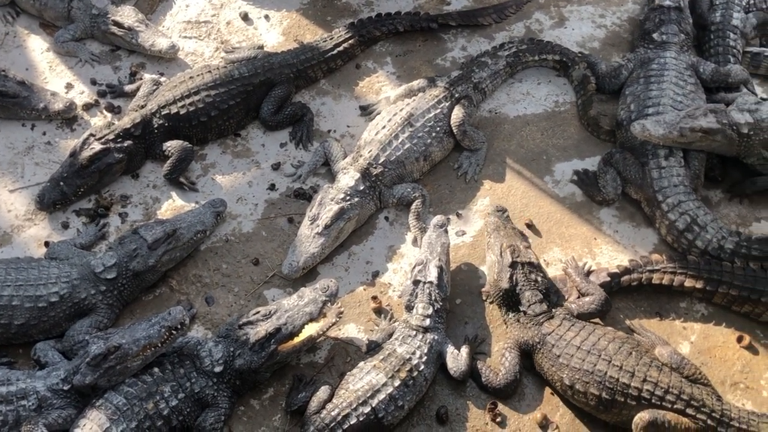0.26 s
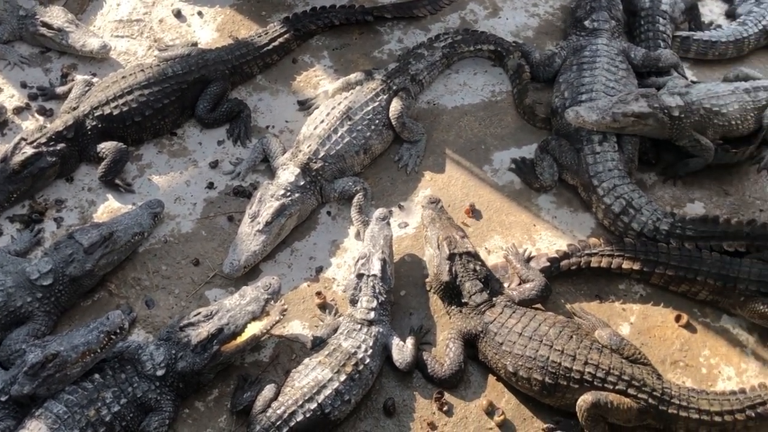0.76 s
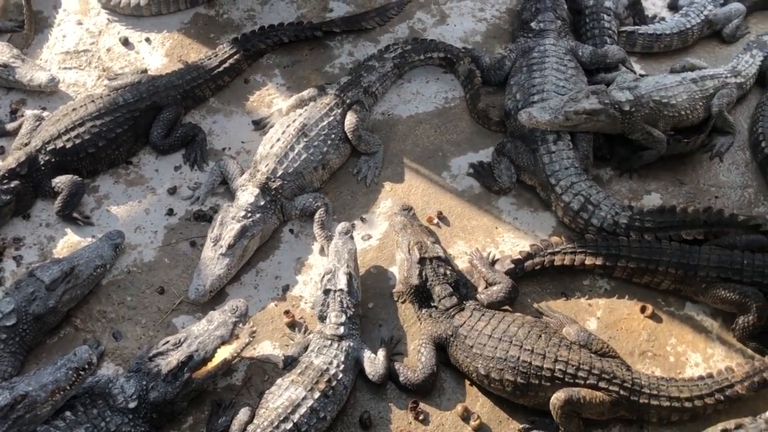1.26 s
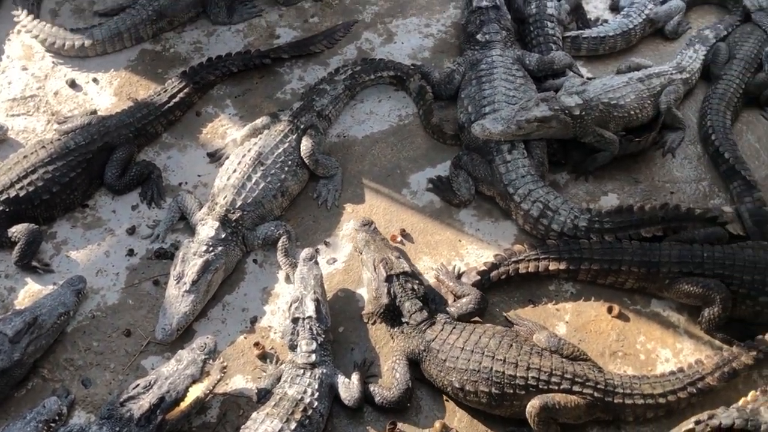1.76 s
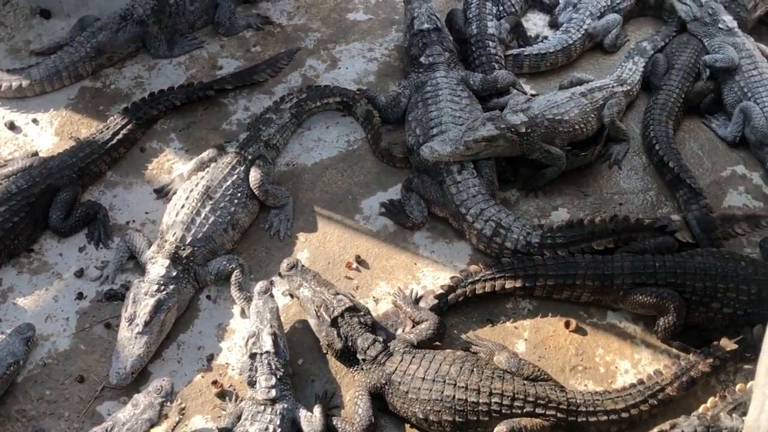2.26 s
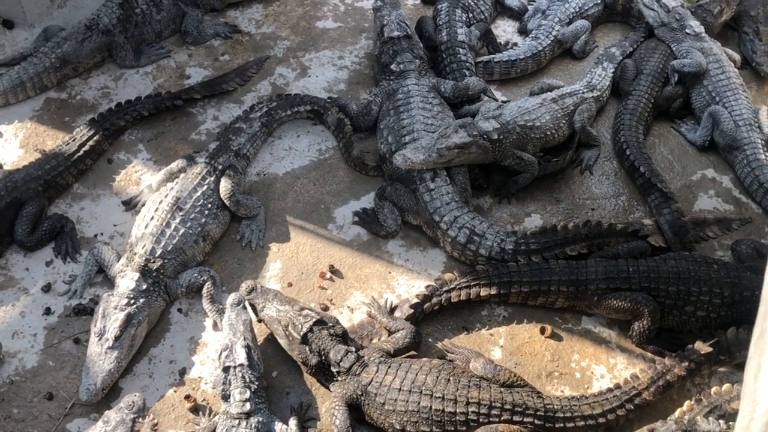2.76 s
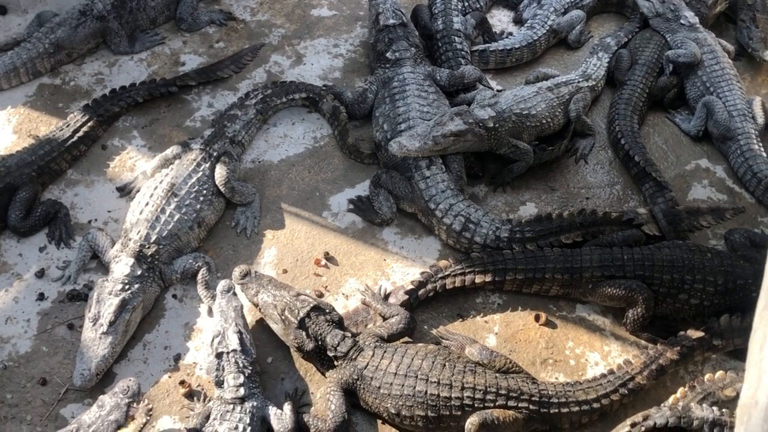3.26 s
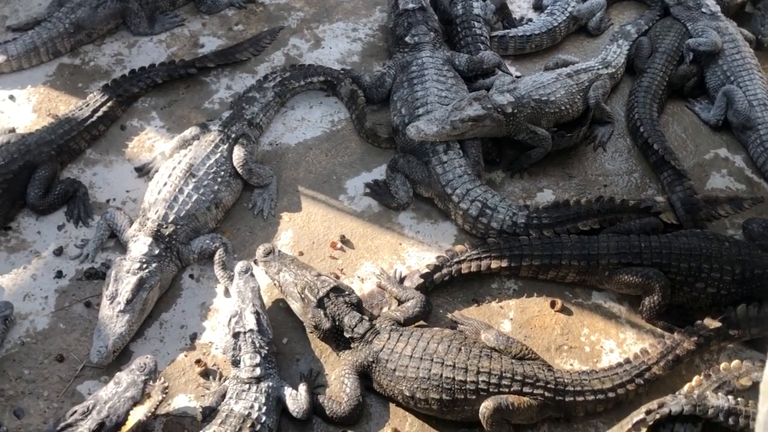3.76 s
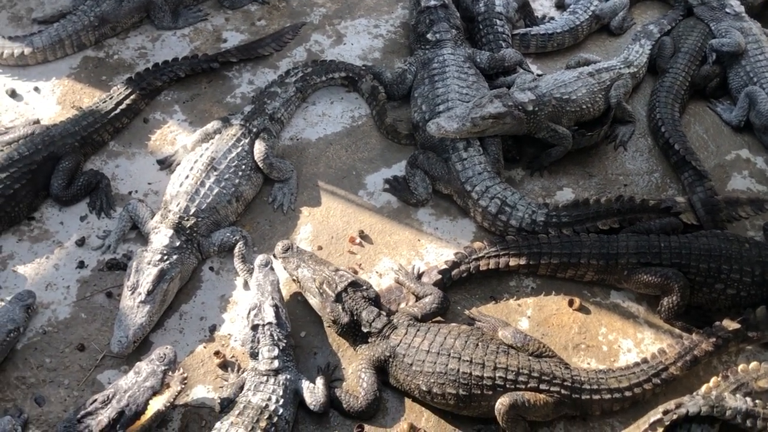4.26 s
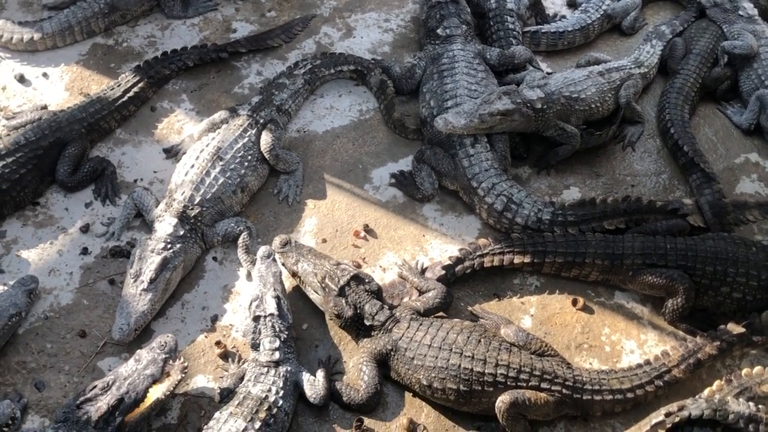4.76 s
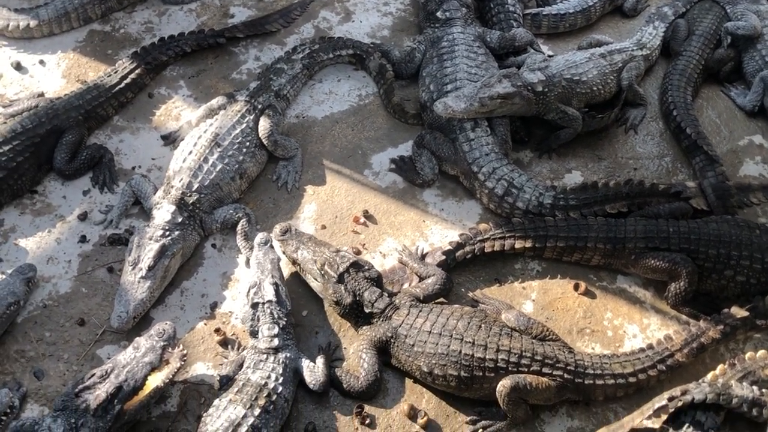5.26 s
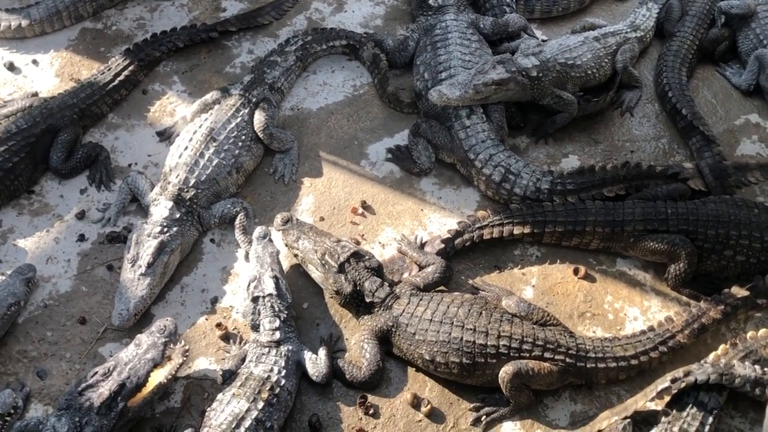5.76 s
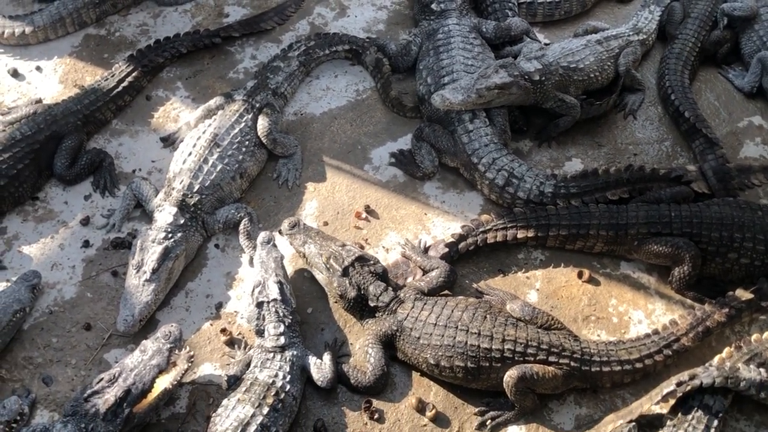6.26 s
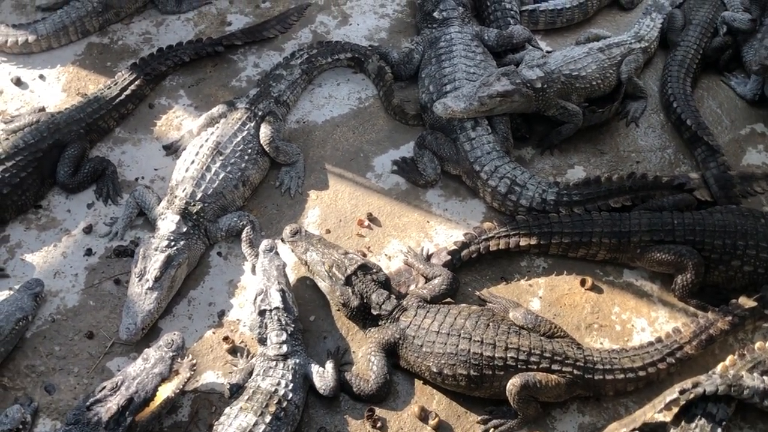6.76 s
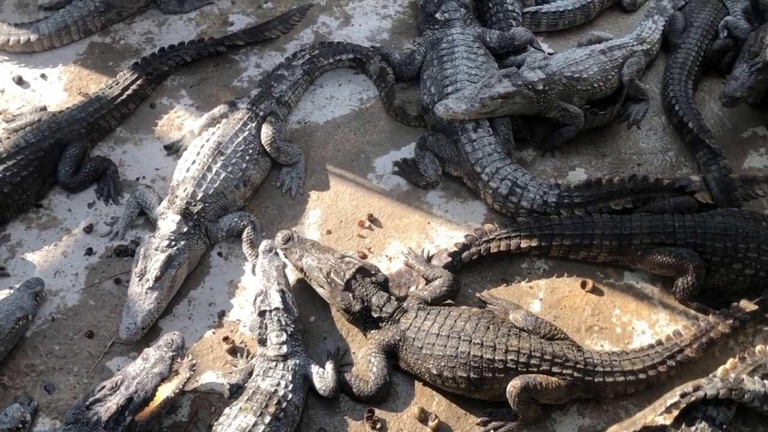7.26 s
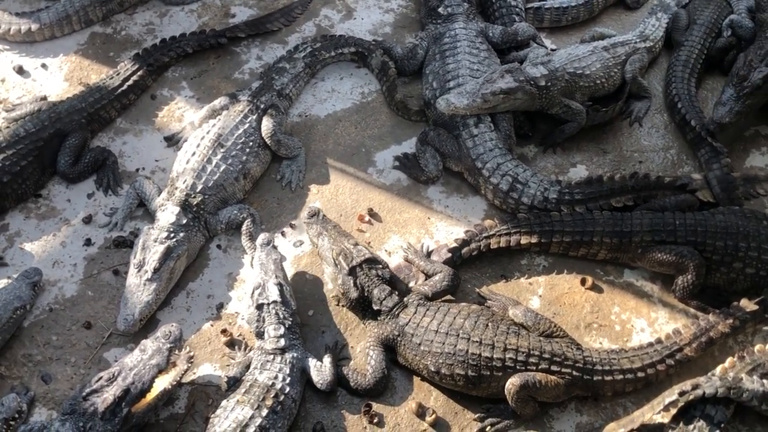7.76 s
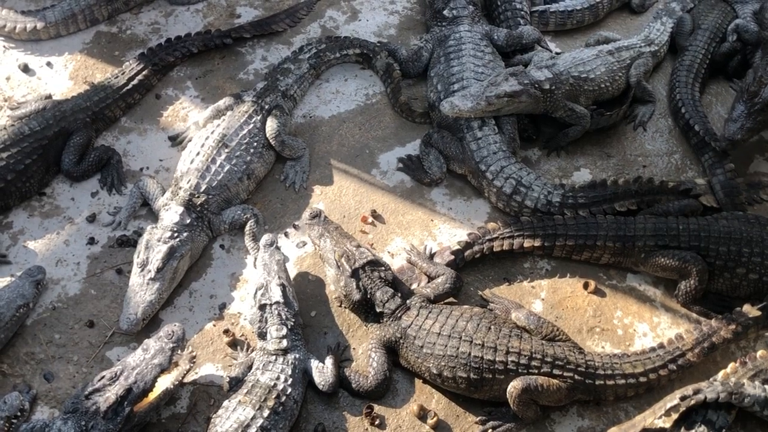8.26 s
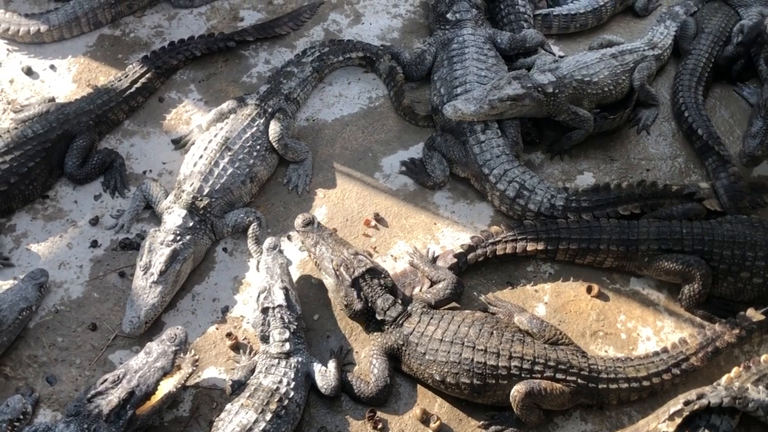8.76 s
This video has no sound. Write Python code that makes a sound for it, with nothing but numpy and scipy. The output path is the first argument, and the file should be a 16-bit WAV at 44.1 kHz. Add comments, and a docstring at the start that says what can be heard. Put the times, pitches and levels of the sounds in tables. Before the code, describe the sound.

Crocodiles crush hard shells in a concrete pen, heard from one microphone at the railing above. Faint crunches and ticks lead to a short grinding and a sharp snap of jaws. Then comes the loudest snap, with a hollow thud of the mouth. A further crunch follows, then teeth slip on a shell and clack shut again. Small scrapes and cracks continue, with a short echo and a faint outdoor rumble.

```python
"""Crocodiles crushing snails

One microphone at the railing above a concrete pen. Close below, shells grind and slip between teeth,
then give way: the jaws clack shut, once with a hollow thud of the mouth. Further off, other animals
crunch and scrape. Splinters tick, and the walls echo it all over a low outdoor rumble."""
import sys
import numpy as np
from scipy import signal
from scipy.fft import rfft, irfft, next_fast_len
from scipy.io import wavfile

SR = 44100
rng = np.random.default_rng(int(sys.argv[2]) if len(sys.argv) > 2 else 0)


def int16_out(signal):
    """Quantize to a 16-bit WAV file."""
    q = np.round(np.clip(np.atleast_2d(signal).T, -1, 1) * 32767)
    wavfile.write(sys.argv[1], SR, q.astype(np.int16))


N = 397341


def jaw_snaps():
    """The shell gives way: teeth meet within milliseconds, the skull knocks, fragments crumble."""
    # Each row: start in seconds, level in dB, relative knock and splinter levels in dB,
    # splinter pitch in Hz, relative level of the crumbling in dB.
    snaps = [(1.912, -26.5, -1, 2.5, 10800, -6.5), (3.0602, -41, 17, -10, 9000, -15),
             (3.7136, -14, 4.5, -6.5, 9200, -13.5), (3.7266, -24.5, 13, -28, 11100, -17),
             (6.5987, -21, 0.5, -1, 8040, -15.5)]
    # Resonances of skull and teeth. Each row: pitch in Hz, width in Hz, relative level in dB.
    skull = [(1280, 330, -2), (1860, 310, -7), (2620, 370, -13)]
    out = np.zeros(N)
    for start, db, knock_db, splinter_db, splinter_hz, crumble_db in snaps:
        blow = burst(0.001, rise=0.00053, fall=0.0018, rate=22000, spread_db=0.44)
        t = np.arange(len(blow)) / SR
        # Each bone resonance builds for a cycle or two; the wider it is, the sooner it dies.
        knock = sum(undb(level) * unit(t * np.exp(-np.pi * width * t) * np.sin(2 * np.pi * hz * t))
                    for hz, width, level in skull)
        crack = unit(band(blow, 1720, 8300)) + undb(splinter_db) * splinters(blow, splinter_hz)
        add(out, start, held(crack + undb(knock_db) * unit(knock), db, 0.0024))
        grains = burst(0.0026, rise=0.0014, fall=0.014, rate=9800, spread_db=5)
        crumbs = unit(band(grains, 910, 3900)) + undb(splinter_db + 5) * splinters(grains, splinter_hz)
        add(out, start + 0.0023, held(crumbs, db + crumble_db, 0.0096))
    return out


def splinters(x, hz):
    """The bright spray of tiny fragments: one broad peak over a wide hiss."""
    peak = unit(ring(band(x, 3500, 23700), hz, 0.33 * hz))
    hiss = unit(band(x, 0.65 * hz, 1.01 * hz))
    return unit(peak + undb(-3.5) * hiss)


def mouth_thuds():
    """A push of air rings the mouth over a deep thump of flesh; a briefer push has a harder front."""
    # Each row: start in seconds, level in dB, decay in seconds, relative thump in dB, top edge in Hz.
    thuds = [(.755, -49.5, 0.02, 7, 600), (1.071, -49, 0.062, 0, 604), (3.7161, -25, 0.0017, -15.5, 700),
             (3.7282, -17, 0.0029, -11.5, 910), (5.19, -48, 0.022, 11, 500), (6.602, -39, 0.003, -2, 800)]
    # Resonances of the mouth. Each row: pitch in Hz, width in Hz, relative level in dB.
    mouth = [(387, 250, 0.5), (503, 150, 4), (740, 90, 0.5)]
    out, t = np.zeros(N), clock(0.18)
    for start, db, fall, thump_db, edge_hz in thuds:
        front = 0.033 / fall * np.exp(-t / 0.00024)
        push = front + rng.standard_normal(len(t)) * np.exp(-t / fall) * (1 - np.exp(-t / 0.00097))
        hollow = unit(band(resonate(push, mouth), 275, edge_hz, order=3))
        thump = undb(thump_db) * unit(band(push, 139, 232))
        add(out, start, held(hollow + thump, db, 2 * fall))
    return out


def shell_grinding():
    """Steady pressure splits a shell in quick uneven steps; its ring sinks as it opens."""
    # Each row: time in seconds, level in dB, splinter treble in dB, shell ring in Hz.
    grind = [(1.476, -48, 11, 3100), (1.515, -58, 0, 3100), (1.6, -50, -5, 3100), (1.65, -46.5, -2, 2970),
             (1.69, -47, 5, 2600), (1.725, -47.5, -2, 2250), (1.81, -53.5, -8, 1750),
             (1.845, -47, -7, 1680), (1.88, -61, 2, 1590)]
    out, (times, *curves) = np.zeros(N), np.transpose(grind)
    steps, scatter_s = np.linspace(times[0], times[-1], 110), 0.0022
    for start, (late, force) in zip(steps, rng.standard_normal((len(steps), 2))):
        db, treble_db, hz = (np.interp(start, times, curve) for curve in curves)
        grains = burst(0.0015, rise=0.0004, fall=0.0024, rate=5000, spread_db=4)
        ringing = unit(ring(band(grains, 1700, 9000), hz, 0.51 * hz))
        shell = unit(ringing + undb(3) * unit(band(grains, 2640, 8400)))
        spray = undb(treble_db) * unit(band(grains, 11800, 15000))
        gain = held(shell, db + 1.3 * force, 0.002).std()
        add(out, start + scatter_s * late, gain * (shell + spray))
    return out


def tooth_slips():
    """Teeth rub, stick and slip on a whole shell, ever harder, until it splits."""
    # Resonances of a whole shell. Each row: pitch in Hz, width in Hz, relative level in dB.
    shell = [(1550, 450, 2.5), (2500, 600, -1), (4550, 2300, -0.5), (7450, 900, 3.5), (8450, 550, 4),
             (13200, 3700, -8)]
    # Each row, as for rub and slips: start in seconds, length in seconds, level in dB.
    splits = [(6.517, 0.0013, -39), (6.541, 0.0018, -37.5), (6.5505, 0.0015, -36), (6.589, 0.003, -34.5)]
    rub = [(6.345, 0.245, -56.5)]
    count, period_s, jitter_s, growth_db_per_s = 6, 0.0352, 0.002, 24
    offsets = period_s * np.arange(count) + jitter_s * rng.standard_normal(count)
    slips = [(6.362 + offset, 0.017, -49 + growth_db_per_s * offset) for offset in offsets]
    out = np.zeros(N)
    for start, length, db in rub + slips + splits:
        grains = burst(length, rise=0.00036, fall=0.0022, rate=5000, spread_db=5.3)
        add(out, start, held(resonate(grains, shell), db, length))
    return out


def shell_ticks():
    """Single cracks: the shard rings briefly and its splinters are over even sooner."""
    # Each row: start in seconds, level in dB, shell ring in Hz, relative splinter treble in dB.
    ticks = [(0.0504, -48.5, 3450, 7), (0.1214, -50.5, 5120, -8), (0.1504, -50, 4940, -8),
             (.396, -55.5, 3500, -18), (1.552, -39.5, 3100, -15), (1.574, -40, 2930, 1),
             (1.7094, -48, 2030, 11), (1.7295, -43.5, 1900, 2), (1.761, -38, 3970, -3.5),
             (1.771, -44, 5070, -3), (1.802, -44.5, 1600, -12), (1.8277, -45, 1650, -9),
             (2.0812, -40, 1980, -7), (2.1148, -42, 2400, 20), (2.3229, -36, 2300, -19),
             (2.3324, -39, 2170, 6), (2.5266, -39, 5900, 5.5), (2.5907, -45, 2260, -2),
             (2.6102, -51, 2410, -12), (2.6705, -50, 1900, -0.5), (3.157, -40.5, 5700, -3),
             (3.5225, -40.5, 5440, -4), (3.557, -43.5, 5970, -6), (3.8605, -38.5, 4000, -5.5),
             (4.1035, -50.5, 2950, -11), (4.182, -50, 4100, -10), (4.272, -43, 5200, -9),
             (4.3125, -45.5, 6100, 8), (4.569, -52, 2360, -8), (6.3405, -51, 3400, -7),
             (8.2886, -53.5, 3400, -13), (8.34, -50.5, 4270, -1), (8.361, -51, 2000, -9),
             (8.971, -47.5, 5380, 1)]
    out = np.zeros(N)
    for start, db, hz, treble_db in ticks:
        crack = burst(0.0006, rise=0.00028, fall=0.0035, rate=20000, spread_db=6.5)
        ringing = unit(ring(band(crack, 880, 8400), hz, 0.23 * hz))
        shard = unit(ringing + undb(-1.5) * unit(band(crack, 1470, 5100)))
        t = np.arange(len(crack)) / SR
        spray = unit(band(crack * np.exp(-t / 0.0022), 7300, 18300))
        add(out, start, held(shard + undb(treble_db) * spray, db, 0.0043))
    return out


def far_crunches():
    """Dense fractures ring a shell, dull body below, splinters above; a longer crush builds slower."""
    # Each row: start and length in seconds, level in dB, ring in Hz, relative body and treble in dB.
    crunches = [(.004, 0.019, -54, 3480, -4, -6), (.528, .025, -51.5, 2650, -15, -1),
                (0.705, 0.034, -52, 3300, 2, -8), (0.797, 0.022, -47, 3970, -1, -7),
                (.826, 0.037, -48, 3960, 3.5, -8), (1.139, 0.039, -55.5, 2950, -.5, -4.5),
                (1.345, 0.02, -55.5, 3650, -25, -5), (1.468, 0.0063, -40, 6000, -28, 1),
                (2.296, 0.045, -47, 2150, 0, 1), (2.377, .006, -45, 2800, -4, 2),
                (2.572, 0.034, -52.5, 2080, 5, -7), (3.078, 0.028, -48.5, 2230, -17, 8.5),
                (3.154, 0.028, -43.5, 5560, -29, 6), (3.284, 0.018, -43, 4600, -11, 3),
                (3.556, 0.27, -55, 5600, -3, 3.5), (3.9, 0.022, -38.5, 1400, -8.5, 1),
                (4.855, 0.027, -50.5, 3760, -8, 2.5), (5.179, 0.013, -42.5, 2710, -1.5, 1),
                (5.191, 0.031, -31.5, 5800, -12, 0), (7.431, 0.032, -63.5, 5540, -26, 24),
                (7.733, 0.021, -57.5, 3400, -15, 9), (8.014, 0.015, -53, 4400, -3, -9),
                (8.469, 0.15, -55.5, 1510, 5.5, -4)]
    out = np.zeros(N)
    for start, length, db, hz, body_db, treble_db in crunches:
        grains = burst(length, rise=0.032 * length, fall=0.0047, rate=7000, spread_db=2.8)
        ringing = unit(ring(band(grains, 1600, 16000), hz, 0.21 * hz))
        shell = unit(ringing + unit(band(grains, 2260, 6440)))
        body = undb(body_db) * unit(band(grains, 390, 1790))
        spray = undb(treble_db) * unit(band(grains, 4000, 15200, order=1))
        add(out, start, held(shell + body + spray, db, length))
    return out


def shell_scrapes():
    """A shell edge chatters on concrete or tooth; as the contact shifts, three resonances take turns."""
    # Each row: start and length in seconds, level in dB, pitch in Hz, width as a share of the pitch.
    scrapes = [(.06, .025, -58.5, 1180, 0.03), (0.425, 0.029, -56, 2450, 0.38),
               (0.526, 0.018, -53, 2640, 0.29), (.797, .012, -49.5, 4000, 0.11),
               (1.219, 0.029, -57.5, 7200, 0.5), (1.50, 0.015, -44, 3040, 0.47),
               (1.549, 0.055, -51, 3050, 0.16), (3.899, .012, -40, 1300, 0.27),
               (3.905, .06, -53.5, 1506, .15), (5.105, 0.046, -57.5, 4630, 1),
               (5.192, 0.026, -35.5, 2230, 0.96), (6.075, .14, -67, 6000, .6), (6.36, .05, -55, 1580, .22),
               (7.735, 0.05, -57.5, 2750, 0.36), (7.75, .12, -63.5, 3220, 0.11),
               (8.001, 0.078, -57, 2430, 0.28), (8.138, 0.12, -60.5, 2280, 0.27)]
    out, sway_db, sway_s = np.zeros(N), 4, 0.018
    for start, length, db, hz, width in scrapes:
        chatter = burst(length, rise=0.0031, fall=0.007, rate=2500, spread_db=2.1)
        t, squeak = np.arange(len(chatter)) / SR, 0
        for side in (-1, 0, 1):
            centre_hz, width_hz = hz * (1 + side * 0.3 * width), 0.57 * width * hz
            swell = undb(sway_db * np.interp(t, sway_s * np.arange(20), rng.standard_normal(20)))
            squeak += swell * unit(ring(ring(chatter, centre_hz, width_hz), centre_hz, width_hz))
        grit = undb(-11) * unit(band(chatter, 2000, 12000))
        add(out, start, held(unit(squeak) + grit, db, length))
    return out


def wall_slaps(x):
    """Distinct, dulled returns from the two nearest walls."""
    # Each row: delay in seconds, gain in dB.
    walls = [(.0201, -18), (0.0283, -8.5)]
    out, dulled = np.zeros(N), band(x, 480, 830, order=1)
    for delay, db in walls:
        add(out, delay, undb(db) * dulled)
    return out


def pen_echo(x):
    """Scattered reflections from floor and walls; the middle range lingers longest."""
    # Each row: band in Hz, seconds to fall by 60 dB, relative level in dB.
    pen = [(122, 0.23, 3), (287, 0.53, -0.5), (500, 0.52, 1), (1010, 0.45, -1), (2350, 0.51, 2.5),
           (5000, 0.51, 0.5), (9000, 0.38, 2.5), (14400, 0.42, 0.5)]
    t, (hz, t60, db) = clock(0.8), np.transpose(pen)
    edges = np.r_[70, np.sqrt(hz[1:] * hz[:-1]), 18000]
    tail = sum(undb(level - 60 * t / decay) * band(rng.standard_normal(len(t)), lo, hi, order=3)
               for lo, hi, decay, level in zip(edges, edges[1:], t60, db))
    tail *= 1 - np.exp(-t / 0.0041)
    return signal.fftconvolve(x, tail / np.sqrt(np.sum(tail ** 2)))[:N]


def rumble_and_rustle():
    """Low outdoor rumble, and the faint gritty rustle of animals shuffling on concrete."""
    # The spectrum that both share. Each row: frequency in Hz, relative density in dB.
    air = [(20, -50), (32, -17), (50, -5.5), (80, -5), (130, -3), (270, -1.5), (320, -10), (640, -13.5),
           (1040, -17), (1560, -23), (3600, -30), (9000, -34.5), (16000, -39)]
    # How each swells and fades. Each row: time in seconds, level in dB.
    rumble_levels = [(.15, -60), (.7, -56), (2, -55.5), (6, -55), (7.3, -56.5), (9, -57)]
    rustle_levels = [(0, -59.5), (.27, -65), (.65, -61), (1.05, -64.5), (2.05, -61), (2.5, -57.5),
                     (2.85, -65), (3.6, -60), (4.45, -67), (4.85, -63), (5.85, -65.5), (6.25, -62.5),
                     (7.15, -68.5), (8.35, -60.5), (8.75, -63.5), (9.0, -56.5)]
    t, size = np.arange(N) / SR, next_fast_len(N)
    freqs, (hz, db) = np.fft.rfftfreq(size, 1 / SR), np.transpose(air)
    colour = undb(np.interp(np.log(freqs + 1), np.log(hz), db))
    low_share = 1 / (1 + (freqs / 1700) ** 4)
    rumble = irfft(rfft(rng.standard_normal(size)) * colour * np.sqrt(low_share), size)[:N]
    grit = rng.standard_normal(size) + undb(-5.5) * crackle(size, rate=500, spread_db=4.6)
    rustle = irfft(rfft(grit) * colour * np.sqrt(1 - low_share), size)[:N]
    flicker_db = 1.1 * np.interp(t, np.linspace(0, t[-1], 160), rng.standard_normal(160))
    return (unit(rumble) * undb(np.interp(t, *np.transpose(rumble_levels)))
            + unit(rustle) * undb(np.interp(t, *np.transpose(rustle_levels)) + flicker_db))


def crackle(size, rate, spread_db):
    """Tiny fractures at random, about rate a second, most weak and a few strong."""
    strength = undb(spread_db * np.minimum(rng.exponential(1, size), 4))
    return unit((rng.random(size) < rate / SR) * rng.choice([-1, 1], size) * strength)


def burst(length, rise, fall, rate, spread_db):
    """A run of fractures that rises, holds and dies away; times in seconds."""
    t = clock(length + 8 * fall + 0.01)
    envelope = (1 - np.exp(-t / rise)) * np.exp(-np.maximum(t - length, 0) / fall)
    return crackle(len(t), rate, spread_db) * envelope


def ring(x, hz, width):
    """One resonance, its width in Hz."""
    return signal.lfilter(*signal.iirpeak(hz, hz / min(width, SR / 4), fs=SR), x)


def resonate(x, modes):
    """A set of resonances, each holding its share of the energy."""
    return unit(sum(undb(db) * unit(ring(x, hz, width)) for hz, width, db in modes))


def band(x, lo_hz, hi_hz, order=2):
    """Band-pass filter."""
    sos = signal.butter(order, [lo_hz, min(hi_hz, 0.48 * SR)], "band", fs=SR, output="sos")
    return signal.sosfilt(sos, x)


def held(x, db, length):
    """Scale a burst to the energy of that level held for that length."""
    return x * undb(db) * np.sqrt(length * SR / (np.sum(x ** 2) + 1e-20))


def undb(db):
    """Decibels to gain."""
    return 10 ** (np.asarray(db) / 20)


def unit(x):
    """Scale to rms 1."""
    return x / np.sqrt(np.mean(x ** 2) + 1e-20)


def clock(length):
    """Sample times over a length in seconds."""
    return np.arange(int(length * SR)) / SR


def add(out, start, x):
    """Mix x into out from start seconds on."""
    i = max(int(start * SR), 0)
    out[i:i + len(x)] += x[:max(N - i, 0)]


def scene():
    """From the railing the near jaws are almost dry; far crunches, scrapes and thuds fill the pen."""
    jaws, mouth = jaw_snaps(), mouth_thuds()
    far = far_crunches() + shell_scrapes()
    shells = shell_ticks() + shell_grinding() + tooth_slips()
    direct = jaws + mouth + far + shells
    echo = pen_echo(undb(-15) * jaws + undb(-8) * mouth + undb(-4.5) * far + undb(-12) * shells)
    return (direct + wall_slaps(mouth) + echo + rumble_and_rustle())[None]


def record(dry):
    """The recorder cuts the top treble steeply."""
    top_hz = 16250
    return signal.sosfilt(signal.ellip(10, 0.2, 70, top_hz, fs=SR, output="sos"), dry)


dry = scene()
out = record(dry)
int16_out(out)
```